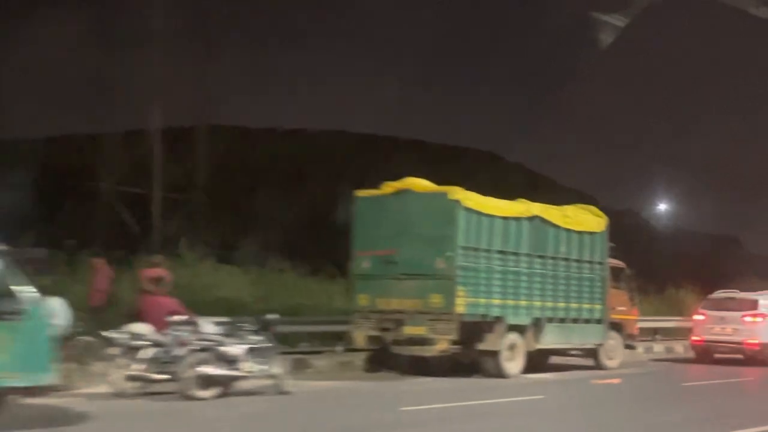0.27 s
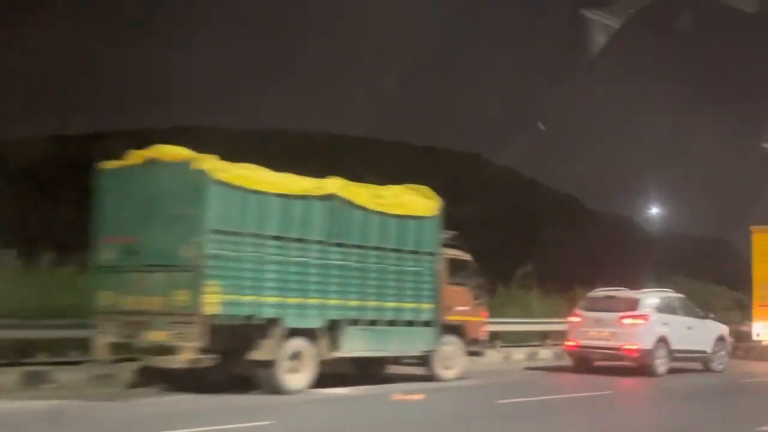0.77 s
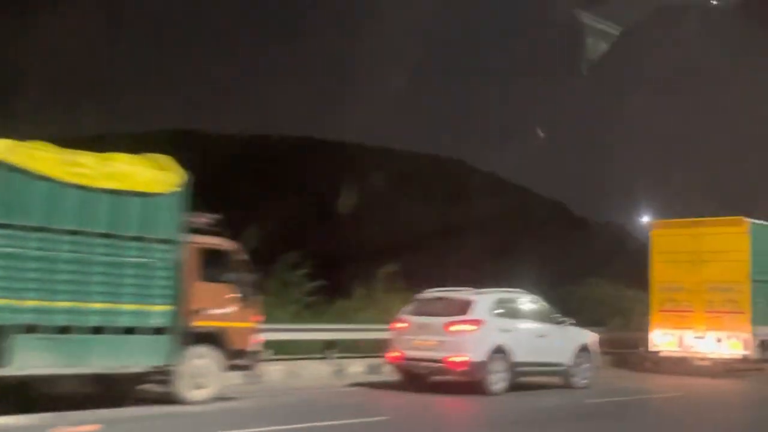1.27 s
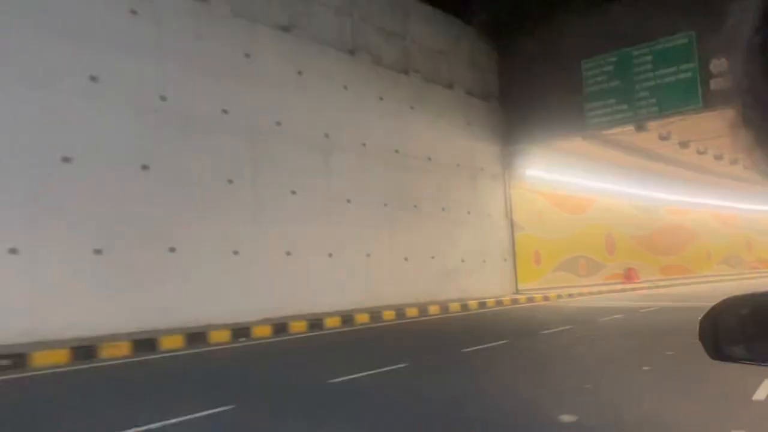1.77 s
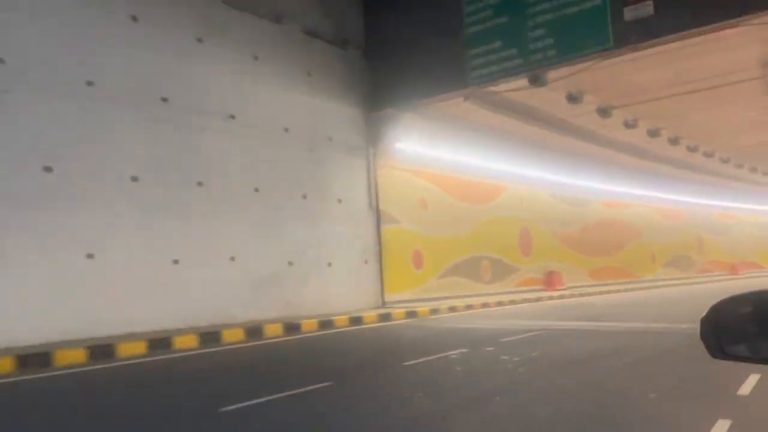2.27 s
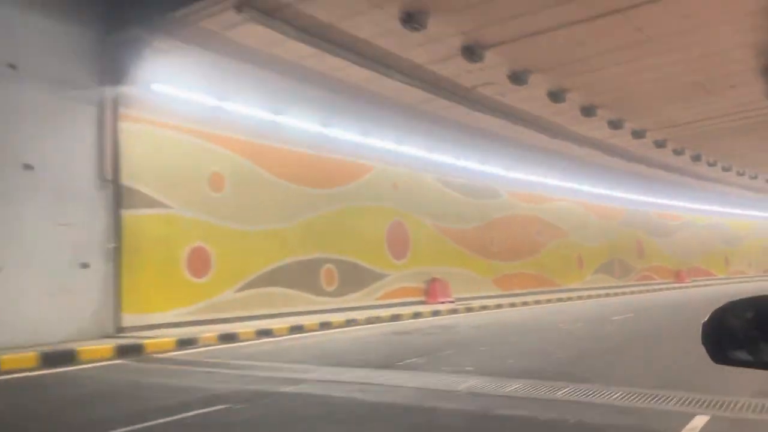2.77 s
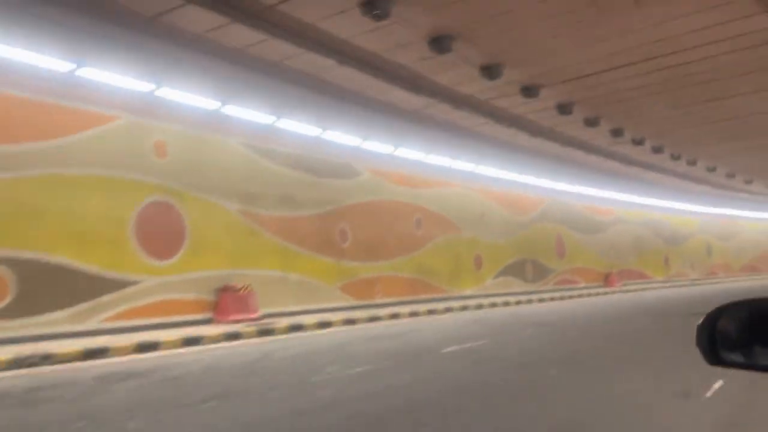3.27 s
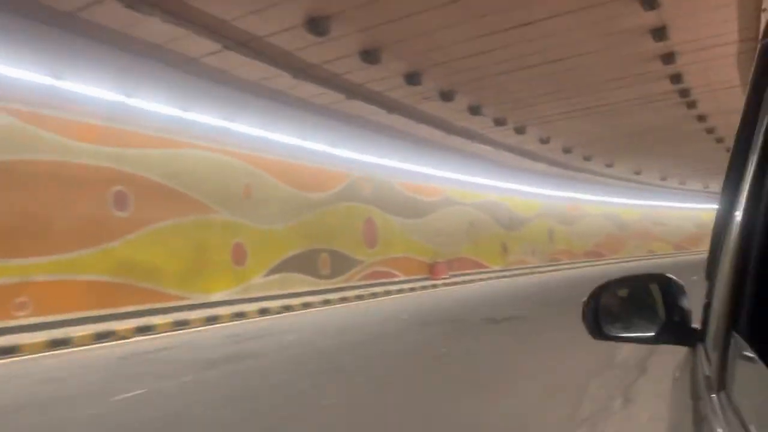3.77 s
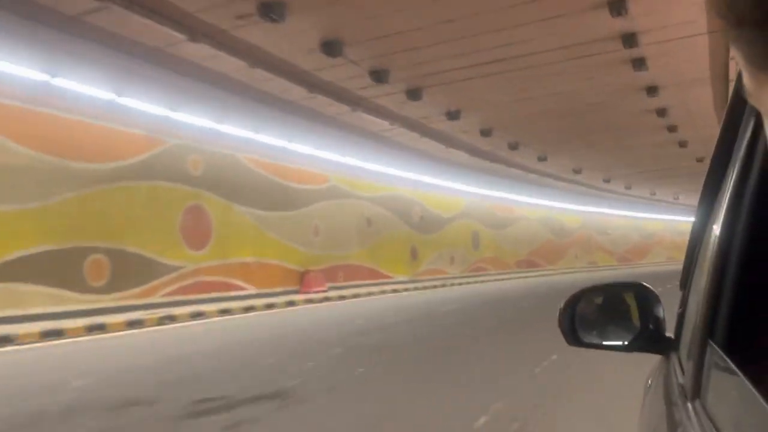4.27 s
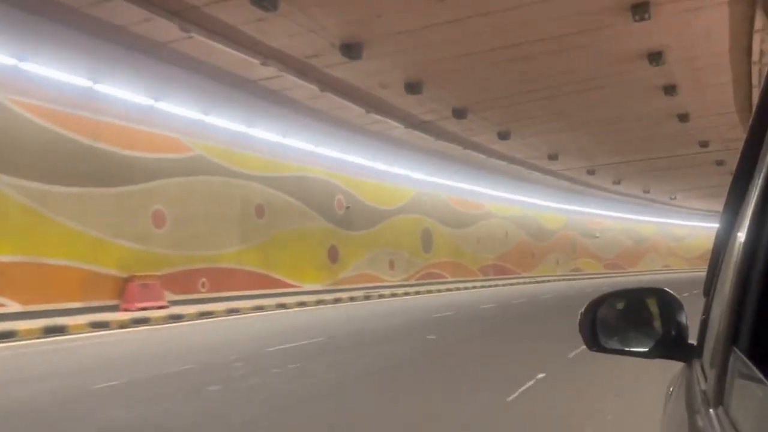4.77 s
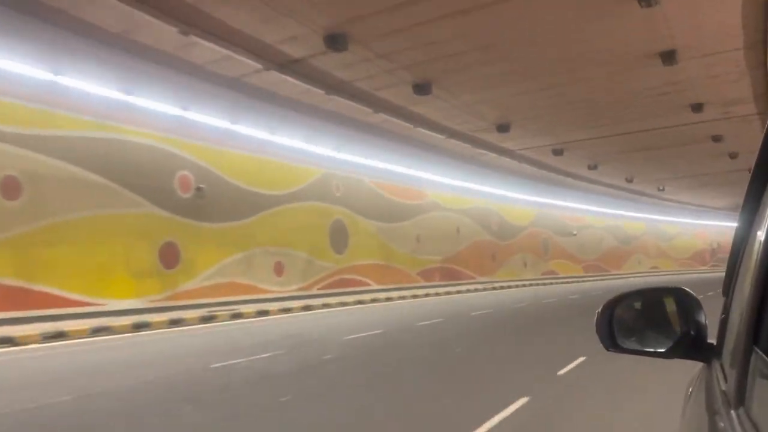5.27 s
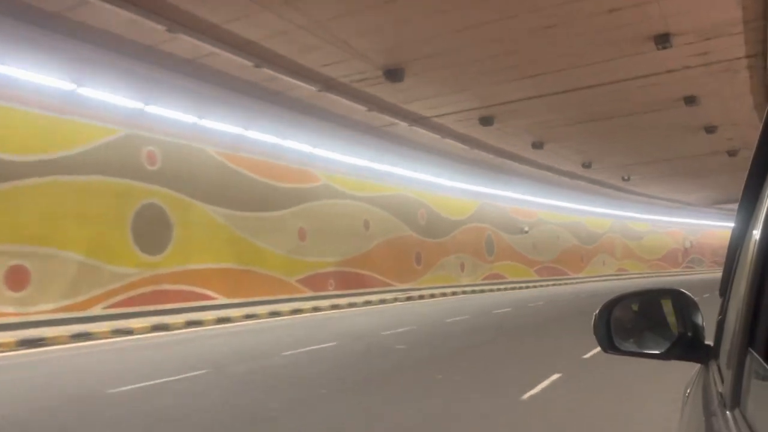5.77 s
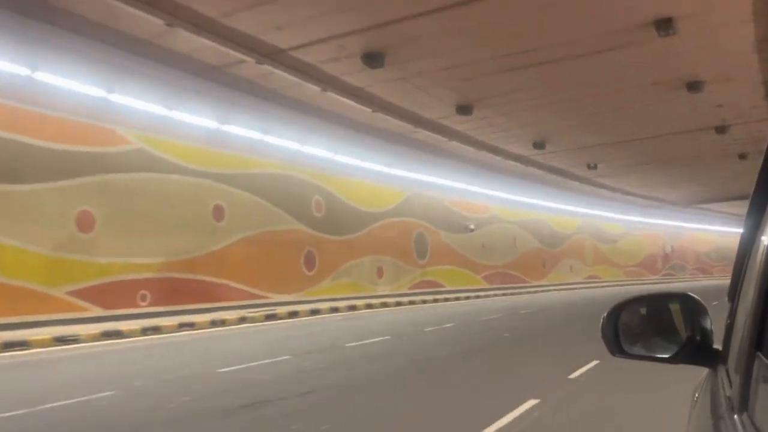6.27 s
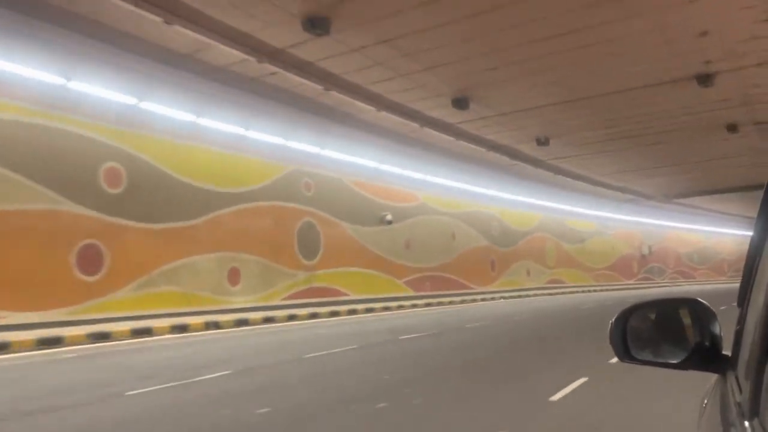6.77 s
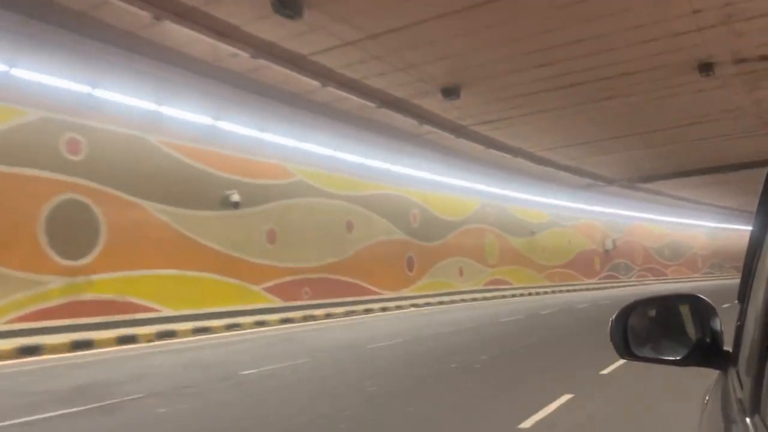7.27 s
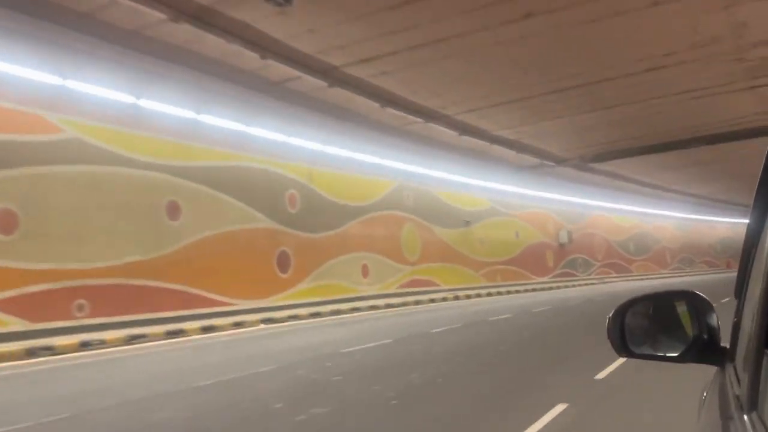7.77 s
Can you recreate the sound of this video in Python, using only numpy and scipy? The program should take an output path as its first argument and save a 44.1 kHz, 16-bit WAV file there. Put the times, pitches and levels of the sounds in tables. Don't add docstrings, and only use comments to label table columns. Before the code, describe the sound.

Deep closed-cabin boom and wavering tyre hum of a fast car, then an abrupt switch to roaring, gusty open-window tunnel wind with sharp cracks.

```python
import sys
import numpy as np
from scipy import signal
from scipy.fft import rfft, irfft, next_fast_len
from scipy.io import wavfile
from scipy.ndimage import uniform_filter1d

SR = 44100
rng = np.random.default_rng(int(sys.argv[2]) if len(sys.argv) > 2 else 0)


def attenuation_scalar(level_db):
    decades = np.asarray(level_db, float) / 20
    return 10 ** decades


def generate_wav(signal):
    frames = np.transpose(np.atleast_2d(signal))
    scaled = np.clip(frames, -1, 1) * 32767
    pcm = np.round(scaled).astype(np.int16)
    wavfile.write(sys.argv[1], SR, pcm)


N = 353629

# [f/Hz, level/dB], only the shape matters
BOOM_COLOUR = [(11, -36.5), (18, -8.5), (38, 2), (81, 3.5), (103, -0.5), (125, -10.5), (160, -22),
               (280, -120)]
DRONE_COLOUR = [(65, -35.5), (110, -14.5), (150, -5.5), (254, -8), (426, -21.5), (678, -30.5), (744, -28.5),
                (834, -36.5), (1100, -35.5), (1300, -63), (1690, -69), (2860, -120)]
VENT_COLOUR = [(1100, -83.5), (1500, -81), (1800, -86), (2300, -89), (3000, -90.5), (3450, -88),
               (3700, -82.5), (4200, -82), (4600, -90.5), (5000, -94.5), (5500, -98.0), (6500, -102.2),
               (7400, -109.8), (7750, -118.7)]
CABIN_AIR_COLOUR = [(8950, -120.1), (10000, -115.6), (11600, -116.8), (12000, -112.2), (12400, -118.0),
                    (13300, -125.5), (13700, -132.4)]
# [f/Hz, level/dB]
CABIN_SIDE_COLOUR = [(40, -58), (97, -54), (140, -59), (250, -63.5), (400, -69.5), (700, -73.5),
                     (1040, -79), (1350, -83.5), (1900, -83.5), (2400, -107.5), (2900, -116.5)]
CABIN_SIDE_HISS_COLOUR = [(6400, -111.1), (7000, -109.1), (8000, -106.8), (9000, -111.1), (9800, -116.5),
                          (10300, -120.0)]
# [f/Hz, level/dB]
RUMBLE_COLOUR = [(11, -60), (18, -49), (22, -21), (24, -18), (30, -20), (54, 2.5), (80, 2), (170, -7),
                 (220, -43), (370, -120)]
GUST_COLOUR = [(82, -23), (140, 1), (183, -0.5), (386, -0.5), (595, -3.5), (1100, -9.5), (1540, -23.5),
               (1960, -24.5), (2500, -39.5), (3250, -72), (5500, -120)]
ROAR_COLOUR = [(1200, -61), (1600, -65), (2000, -66.5), (2500, -72.5), (3200, -78.5), (4000, -81.5),
               (5000, -87), (6000, -89), (7000, -94), (7600, -103.0)]
TUNNEL_AIR_COLOUR = [(8950, -106.7), (9500, -101.3), (10500, -102.1), (11500, -105.0), (12500, -109.1),
                     (13300, -115.0), (13700, -119.6)]
# [f/Hz, level/dB]
GUST_SIDE_COLOUR = [(15, -47), (25, -3), (56, -0.5), (102, 1), (170, -0.5), (555, 2.5), (810, 1),
                    (1240, -8), (1500, -10.5), (1950, -34), (3300, -120)]
ROAR_SIDE_COLOUR = [(1200, -61), (1700, -63), (2000, -69), (2600, -75), (3300, -82), (4200, -88),
                    (5700, -89), (6400, -100.5), (7200, -89.5), (8200, -95.5), (9300, -92), (10300, -108.1)]
# [f/Hz, level/dB]
SIDE_AIR_COLOUR = [(12500, -125.9), (13200, -115.1), (14400, -109.2), (15100, -110.5), (15650, -117.2)]
# [f/Hz, level/dB]
PORT_LEAN = [(400, 0), (1000, 1.5), (2000, 2.5), (4000, 0.5), (7000, 2.5)]
# [lowest f/Hz, highest f/Hz]
MID_GAPS = [(7650, 8950), (13760, 22050)]
SIDE_GAPS = [(10350, 12500), (15720, 22050)]

# [t/s, level/dB]
HUM_LEVEL = [
    (0.0, -43),
    (0.17, -33.5),
    (0.388, -26.5),
    (0.47, -29.5),
    (1.014, -29.5),
    (1.286, -24.5),
    (1.518, -37.5),
    (1.63, -33.5),
    (1.77, -51),
]
# [t/s, level change/dB, half length/s]
BUMPS = [(0.0, 7.5, 0.025), (0.098, 1, 0.014), (0.35, -7, 0.013), (0.4, 2.5, .06), (0.488, -8, 0.014),
         (0.62, 3, 0.055), (0.684, -4, 0.039), (0.89, -8, 0.037), (0.96, 3, 0.094), (1.384, 5, 0.029),
         (1.468, -3, .025), (1.502, 6, 0.0094), (1.696, -5.5, 0.026), (1.77, 4.5, 0.038)]
# [t/s, level change/dB, half length/s]
VENT_PUFF = [
    (.65, 5.5, .07),
]
# [t/s, level/dB]
ROAR_LEVEL = [
    (1.78, -42),
    (1.83, -40),
    (1.95, -40.5),
    (2.4, -41.5),
    (2.8, -39),
    (4.59, -36.5),
    (5.04, -38),
    (6.53, -37.5),
    (8.0, -38.5),
]
# [t/s, level change/dB, half length/s]
THROBS = [(2.21, -11, 0.026), (2.32, 2, 0.07), (2.37, -11, 0.017), (2.46, 4.5, 0.028), (2.52, -6, 0.016),
          (2.76, -7, 0.036), (3.14, 3, .1), (3.83, -4, .04), (3.98, 2.5, .06), (4.13, -16, 0.022),
          (4.285, -16, 0.026), (4.33, 8, 0.022), (4.72, 3.5, .08), (5.02, -3.5, 0.11), (5.44, 0.5, 0.045),
          (5.55, -10, .04), (5.685, -13, 0.013), (5.93, -7, 0.027), (6.1, 2.5, 0.052), (6.43, -4, 0.081),
          (6.52, -1.5, 0.034), (7.1, -0.5, .022), (7.33, -1, 0.029), (7.4, 8.5, 0.027), (7.435, -15, 0.024),
          (7.47, 0, 0.026), (7.55, -3, 0.021), (7.77, -6.5, 0.041), (7.95, 3, .05), (8.01, -15, 0.043)]
# [peak t/s, level/dB, rise/s, fade/s]
GUSTS = [(1.829, -11.5, 0.048, 0.15), (2.18, -15, 0.24, 0.017), (2.28, -17.5, 0.11, 0.4),
         (2.45, -13, 0.041, 0.029), (2.7, -11, 0.13, 0.053), (2.799, -16, 0.045, 0.29),
         (3.22, -17.5, 0.52, 0.31), (3.34, -16.5, 0.092, 0.049), (3.48, -16, .12, 0.08),
         (3.559, -12.5, .02, 0.022), (3.67, -16, 0.055, 0.03), (3.75, -21, .08, 0.27),
         (4.22, -17, 0.099, 0.048), (4.42, -18, 0.54, 1.3), (4.6, -14.5, .07, 0.057),
         (4.69, -15.5, 0.026, 0.44), (5.138, -13, 0.064, 0.013), (5.24, -15.5, 0.024, 0.043),
         (5.33, -18, 0.11, .04), (5.59, -20, 0.52, 0.037), (5.71, -19.5, 0.082, 0.21),
         (5.849, -12, 0.042, 0.073), (5.97, -18.5, .1, 0.57), (6.16, -15, 0.32, 0.029),
         (6.51, -14, 0.052, 0.046), (6.72, -16.5, 0.56, 0.25), (6.91, -14, 0.056, 0.095),
         (7.11, -18, 0.093, 0.43), (7.46, -15, 0.039, 0.027), (7.91, -12.5, 0.025, 0.024)]
# [t/s, peak level/dB, f/Hz, left over right/dB]
PUFFS = [(1.796, -9, 490, 1.5), (1.833, -1.5, 436, 1.5), (1.893, -6, 404, 1.0), (1.957, -9, 423, -0.5),
         (2.019, -13.5, 493, 2.5), (2.124, -5, 546, 1.0), (2.178, -13, 503, -2), (2.242, -9, 794, 0.0),
         (2.277, -7, 435, -1), (2.36, -6, 610, 1.0), (2.449, -6.5, 624, 0.5), (2.611, -6.5, 417, -1),
         (2.755, -7, 525, 3.0), (2.799, -3, 401, 1.0), (2.852, -7, 509, 0.0), (2.899, -10, 405, 1.5),
         (3.129, -6, 520, 1.0), (3.174, -4, 458, -0.5), (3.441, -14, 425, 0.0), (3.473, -8, 520, -1.5),
         (3.669, -5.5, 580, 1.5), (4.06, -13, 458, -0.5), (4.216, -5.5, 552, 0.5), (4.264, -12.5, 850, 3.0),
         (4.426, -15, 420, 1.5), (4.45, -7, 394, 0.0), (4.577, -9, 810, -0.5), (4.687, -13, 511, 2.0),
         (4.708, -10, 563, -1.0), (4.787, -8, 401, 0.5), (5.015, -10, 546, 4), (5.131, -7.5, 620, -0.5),
         (5.228, -12, 657, -3), (5.294, -13, 410, -2), (5.583, -13, 680, 2.5), (5.699, -8, 641, -1.0),
         (5.734, -6.5, 594, -3), (5.838, -3, 550, -5), (5.903, -6, 641, -0.5), (5.963, -14, 550, 0.0),
         (6.127, -11, 517, -0.5), (6.436, -10.5, 466, 1.5), (6.484, -13, 423, -1), (6.745, -10, 624, -1.0),
         (6.875, -8.5, 423, -1.0), (6.922, -6, 610, -1.0), (6.983, -8, 571, -5), (7.192, -5, 794, 0.0),
         (7.448, -9, 520, -2), (7.908, -4, 546, -2)]
# [t/s, peak level/dB, treble level/dB, left over right/dB]
CRACKS = [(1.7968, -23.5, -25, 9), (1.821, -27, -17, 8), (1.8318, -15.5, -20, 9.5), (1.842, -30, -13, 7),
          (1.852, -22, -13, 8.7), (1.875, -27.5, -21, 7), (1.894, -29, -10, 23.5), (2.245, -29, -17, 8),
          (2.2763, -26, -16, 5), (2.2933, -29, -22, 5), (2.3938, -30, -22, 6), (2.37, -30, -19, 5.9),
          (2.586, -28.5, -13, 17), (2.646, -21, -17, 8), (2.689, -20, -18, 7), (2.7565, -18.5, -12, 4.5),
          (2.8005, -25.5, -21, 14), (2.885, -27, -21, 2), (2.934, -23, -14, 10), (2.946, -27, -18, 6),
          (3.0895, -33, -20, 5), (3.208, -31, -17, 5), (3.419, -30, -18, 2), (3.2654, -28, -7, 12),
          (3.3188, -23.5, -16, 4), (4.3464, -27.5, -2, 2), (4.386, -28, -20, 3), (4.633, -29, -20, 4),
          (4.455, -24, -26, 6), (4.518, -25.5, -17, 8), (4.594, -23.5, -21, -2), (5.097, -30, -8, 2.5),
          (5.585, -27, -21, 5), (5.607, -31, -19, 2), (5.847, -25, -25, 13), (5.8542, -24, -23, -21),
          (5.8668, -27, -24, -12), (6.071, -27.5, -23, 2), (6.2, -28, -20, 3), (6.2815, -27, -20, 3),
          (6.876, -26.5, -21, 1.5), (6.4886, -23.5, -30, 4), (7.0998, -26, -19, -20),
          (7.741, -28.5, -22, 2)]

CUT_S = 1.77565
BOOM_DB, RUMBLE_DB = -15.5, -23
LULL_DB, GUST_DROP_DB = -23.5, 8.5


def evened(x):
    return x / np.sqrt(np.mean(x ** 2) + 1e-20)


def read(colour, hz):
    f, level = np.transpose(colour)
    return np.interp(np.log(hz + 1), np.log(f + 1), level - level.max(), -150, -150)


def curve(rows):
    s, level = np.transpose(rows)
    return np.interp(np.arange(N) / SR, s, level)


def swells(rows):
    t = np.arange(N // 64 + 2)[:, None] * 64 / SR
    s, db, half = np.transpose(rows)
    bells = db * np.exp(-((t - s) / half) ** 2)
    return np.repeat(bells.sum(1), 64)[:N]


def noise(colour, patchy_db, size=1024, sag=0):
    frames, hz = 4 * N // size + 5, np.fft.rfftfreq(size, 1 / SR)
    a, b, patches = rng.standard_normal((frames, len(hz), 3)).T
    patches = uniform_filter1d(patches, size // 100, 0)
    patches = evened(uniform_filter1d(patches, 8192 // size, 1))
    stretch = 1
    if sag:
        frame_s = np.arange(frames) * size / 4 / SR
        stretch = 1 + sag * (frame_s - 1)
    level_db = read(colour, hz[:, None] * stretch) + patchy_db * patches
    spectra = (a + 1j * b) * attenuation_scalar(level_db)
    return evened(signal.istft(spectra, nperseg=size, noverlap=3 * size // 4)[1][:N])


def steadied(x, s):
    width = round(s * SR)
    power = uniform_filter1d(uniform_filter1d(x ** 2, width), width)
    return evened(x / np.sqrt(abs(power) + .02))


def flutter(depth_db, hz):
    wander = signal.sosfilt(signal.butter(1, hz, fs=SR, output="sos"), rng.standard_normal(N))
    wander = signal.sosfilt(signal.butter(4, 400, fs=SR, output="sos"), wander)
    return evened(attenuation_scalar(depth_db * evened(wander)))


def wavering(hz, db, spread):
    drift = uniform_filter1d(rng.standard_normal(N), size=3000)
    drift = evened(uniform_filter1d(drift, size=3000))
    return attenuation_scalar(db + 1.0) * np.sin(2 * np.pi * np.cumsum(hz * (1 + spread * drift)) / SR)


def panned(db, pan_db):
    return attenuation_scalar(db + np.array([[pan_db / 2], [-pan_db / 2]]))


def add(mix, s, sound):
    part = mix[:, round(s * SR):][:, :sound.shape[1]]
    part += sound[:, :part.shape[1]]


def ports(mid, side):
    size = next_fast_len(N + 8192)
    hz = np.fft.rfftfreq(size, 1 / SR)

    def gapped(x, gaps):
        padded = np.pad(x, (4096, size - N - 4096), "reflect")
        return rfft(padded) * np.all([(hz < lo) | (hz > hi) for lo, hi in gaps], 0)

    mid, side = gapped(mid, MID_GAPS), gapped(side, SIDE_GAPS)
    lean_db = np.interp(hz, *np.transpose(PORT_LEAN)) / 2
    bass_cut = 1 / np.sqrt(1 + (39 / (hz + 1)) ** 14)
    pair = np.array([mid + side, mid - side]) * attenuation_scalar([lean_db, -lean_db]) * bass_cut
    return irfft(pair, size)[:, 4096:4096 + N]


def vent():
    hiss = attenuation_scalar(-48.5) * noise(VENT_COLOUR, .8, sag=.035)
    return hiss + attenuation_scalar(-80 + swells(VENT_PUFF)) * noise(CABIN_AIR_COLOUR, 2.8)


def cabin_side():
    side = attenuation_scalar(-35.5) * noise(CABIN_SIDE_COLOUR, 1.1, size=4096)
    side += attenuation_scalar(-73.0) * noise(CABIN_SIDE_HISS_COLOUR, 1.1)
    return side + attenuation_scalar(-86.0) * noise(SIDE_AIR_COLOUR, 2.5)


def motor(boom_db):
    engine = wavering(89.4, -23.5, 0.0613) * attenuation_scalar(0.36 * (boom_db - BOOM_DB))
    return engine + wavering(12000, -90, .004)


def tyre_hum():
    hz = 239 - 1.2 * np.arange(N) / SR
    tone = np.sin(2 * np.pi * np.cumsum(hz) / SR)
    return attenuation_scalar(curve(HUM_LEVEL) + 2.5) * tone * flutter(1.5, hz=25)


def body(boom_db):
    boom = attenuation_scalar(boom_db) * steadied(noise(BOOM_COLOUR, 0.43, size=8192), 0.041)
    return boom + attenuation_scalar(-25) * noise(DRONE_COLOUR, .9, size=4096)


def cabin():
    boom_db = uniform_filter1d(BOOM_DB + swells(BUMPS), size=128)
    pair = ports(vent() + motor(boom_db) + tyre_hum() + body(boom_db), cabin_side())
    end = round(CUT_S * SR)
    opening = np.exp(-(np.arange(N) / (.003 * SR)) ** 2)
    pair += (.09 - pair[:, :1]) * opening
    trough = np.exp(-((np.arange(N) - end) / (0.002 * SR)) ** 2)
    return pair + (-.17 - pair[:, end:end + 1]) * trough


def roar(eddies):
    level_db = curve(ROAR_LEVEL)
    mid = attenuation_scalar(level_db + 4.0) * noise(ROAR_COLOUR, 1.25) * eddies ** 0.22
    mid += attenuation_scalar(level_db - 30) * noise(TUNNEL_AIR_COLOUR, 2.5)
    side = attenuation_scalar(level_db + 2.5) * noise(ROAR_SIDE_COLOUR, 1.1) * eddies ** 0.16
    return mid, side + attenuation_scalar(-77.5) * noise(SIDE_AIR_COLOUR, 2.5)


def rumble(gust_db, eddies):
    smooth_db = uniform_filter1d(gust_db + 22, round(.12 * SR))
    level_db = uniform_filter1d(RUMBLE_DB + 0.52 * smooth_db + swells(THROBS), size=128)
    air = steadied(noise(RUMBLE_COLOUR, 0.39, size=4096) * eddies ** 0.099, 0.074)
    build_up = np.clip((np.arange(N) / SR - CUT_S) / 0.024, .15, 1)
    return attenuation_scalar(level_db) * air * build_up


def wind_db():
    t = np.arange(N // 64 + 2)[:, None] * 64 / SR
    s, db, rise, fade = np.transpose(GUSTS)
    each = db - GUST_DROP_DB * abs(t - s) / np.where(t < s, rise, fade)
    strongest = np.maximum(each.max(1), LULL_DB)
    return uniform_filter1d(np.repeat(strongest, 64)[:N], size=128)


def hush(depth, s):
    t = np.arange(N) / SR
    strike_s = np.array([row[0] for row in PUFFS] + [N])
    ahead = strike_s[np.searchsorted(strike_s, t).clip(0, len(PUFFS))] - t
    return 1 - depth * uniform_filter1d(np.exp(-(ahead / s) ** 2), size=60)


def gusts(gust_db, eddies):
    level_db = gust_db + 0.095 * uniform_filter1d(swells(THROBS), size=128)
    mid = attenuation_scalar(level_db) * steadied(noise(GUST_COLOUR, 1.0) * eddies, 0.053) * hush(0.59, 0.0072)
    differing = steadied(noise(GUST_SIDE_COLOUR, 0.97) * eddies, 0.044)
    return mid, attenuation_scalar(level_db - 6.5) * differing * hush(.55, .006), level_db


def crackle(gust_db):
    happens = rng.random((2, N)) < 60 / SR
    size = attenuation_scalar(4.0 * np.minimum(rng.exponential(1, (2, N)), 3)) * happens
    t = np.arange(-40, 41) / SR
    snap = np.sin(2 * np.pi * 2300 * t + .8) * np.exp(-(t / .00022) ** 2)
    sized = size * attenuation_scalar(-38 + 1.5 * (gust_db + 20) + np.array([[0], [-4.0]]))
    return signal.oaconvolve(sized, snap[None], "same")


def puffs():
    out, t = np.zeros((2, N)), np.arange(-200, 600) / SR
    for (s, db, hz, pan_db), turn in zip(PUFFS, rng.random(len(PUFFS))):
        cycles = np.where(t < .0015, .5, 1.5)
        puff = np.sin(2 * np.pi * (hz * t + turn)) * np.exp(-((t - .0015) * hz / cycles) ** 2)
        add(out, s - 200 / SR, panned(db - 2.5, pan_db) * puff)
    return out


def cracks():
    out, t = np.zeros((2, N)), np.arange(-200, 600) / SR
    thump = attenuation_scalar(10.0) * np.sin(2 * np.pi * 1300 * t) * np.exp(-(t / 0.00038) ** 2)
    middle = np.cos(2 * np.pi * 2500 * t) * np.exp(-(t / 0.00023) ** 2)
    edge = np.cos(2 * np.pi * 5600 * t) * np.exp(-(t / 0.000064) ** 2)
    chances = rng.standard_normal((len(CRACKS), 2, len(t)))
    for (s, db, treble_db, pan_db), (tear, ragged) in zip(CRACKS, chances):
        rare = np.sign(tear) * (abs(tear) > 2.1)
        steps = attenuation_scalar(-6) * rare * (t > 0) * np.exp(-t / 0.0018)
        tail = attenuation_scalar(-25) * ragged * (t > 0) * np.exp(-t / 0.0047)
        torn = np.convolve((t == 0) + steps + tail, thump + middle + attenuation_scalar(treble_db) * edge)[200:1000]
        add(out, s - 200 / SR, panned(db + 0.2, pan_db) * torn)
    return out


def tunnel():
    wind = wind_db()
    eddies = flutter(2.8, hz=57.3)
    roar_mid, roar_side = roar(eddies)
    gust_mid, gust_side, gust_db = gusts(wind, eddies)
    left, right = crackle(gust_db) + puffs() + cracks()
    mid = roar_mid + rumble(wind, eddies) + gust_mid + (left + right) / 2
    pair = ports(mid, roar_side + gust_side + (left - right) / 2)
    start = round(CUT_S * SR)
    lull = np.exp(-((np.arange(N) - start) / (.006 * SR)) ** 2)
    return pair * (1 - .8 * lull) - .2 * pair[:, start:start + 1] * lull


def scene():
    return np.where(np.arange(N) < CUT_S * SR, cabin(), tunnel())


def roll_off(x):
    return signal.sosfilt(signal.butter(12, 16500, fs=SR, output="sos"), x)


def record(dry):
    to_end = np.arange(N)[::-1] / (.004 * SR)
    fade = np.sin(np.pi / 2 * to_end.clip(0, 1)) ** 2
    mix = 1.05 * np.tanh(dry / 1.05) * fade
    return roll_off(mix)


dry = scene()
out = record(dry)
generate_wav(out)
```